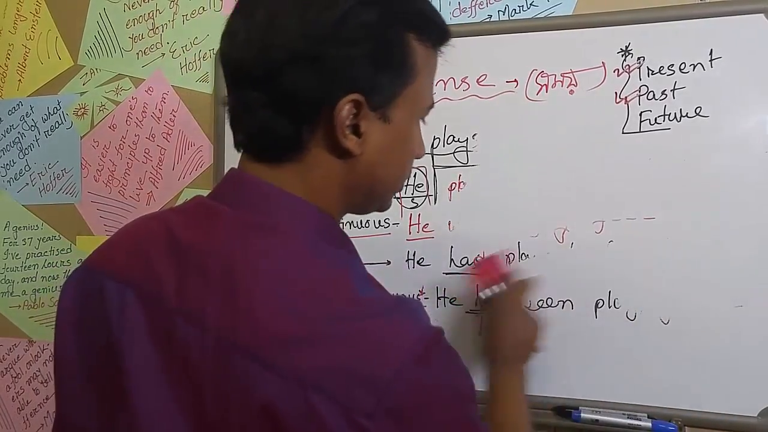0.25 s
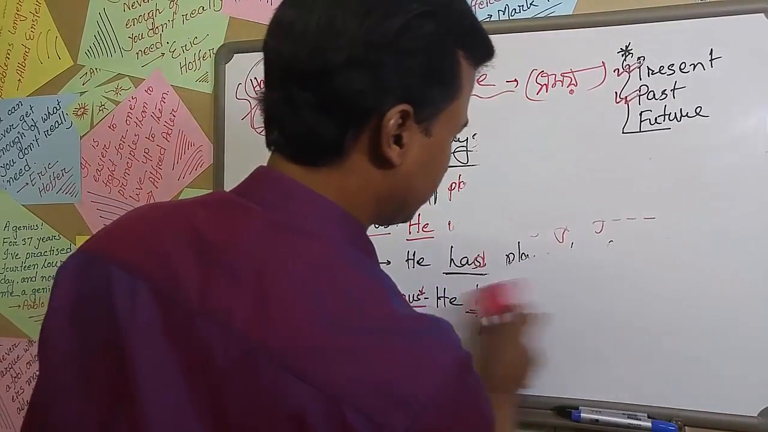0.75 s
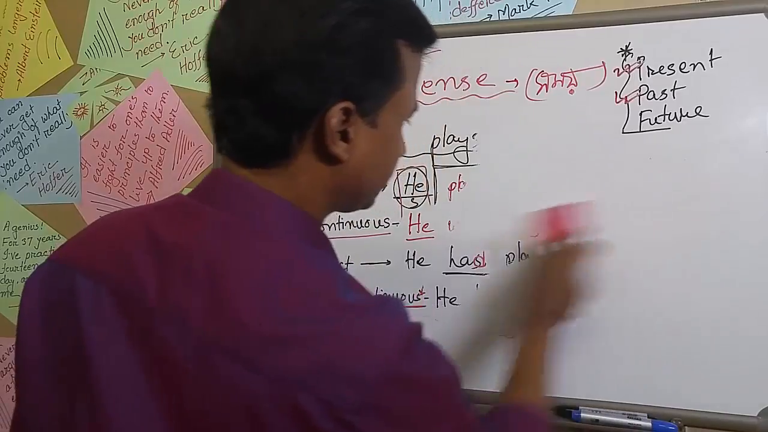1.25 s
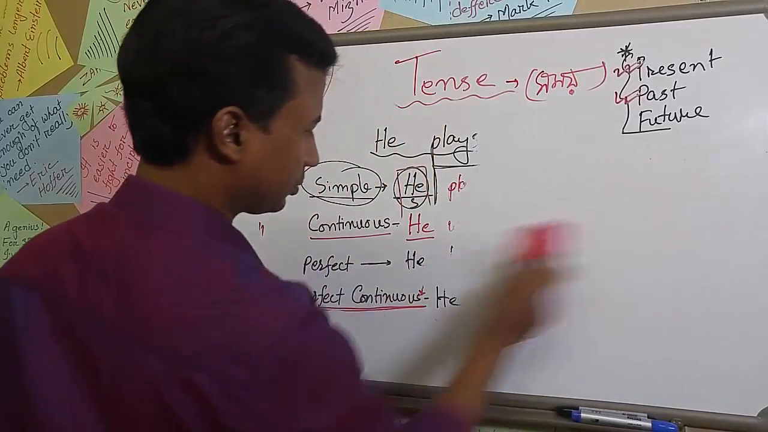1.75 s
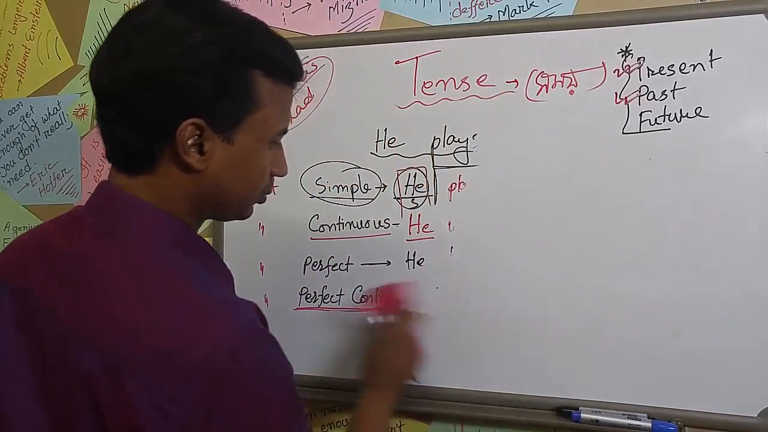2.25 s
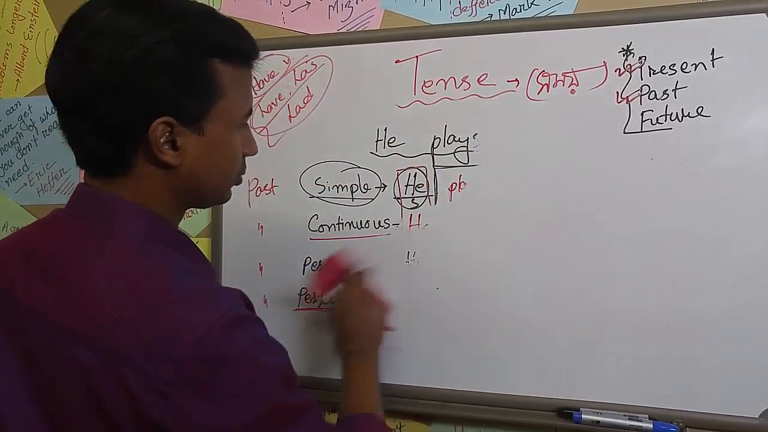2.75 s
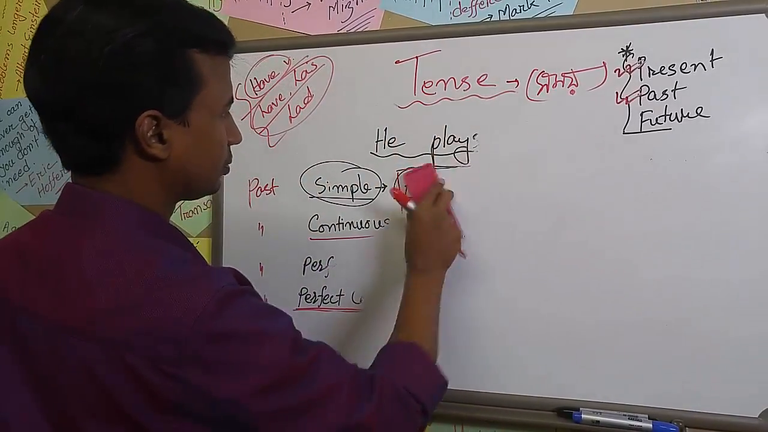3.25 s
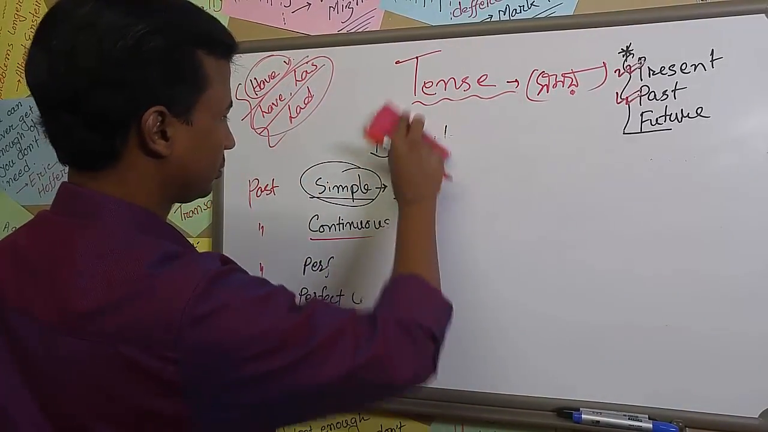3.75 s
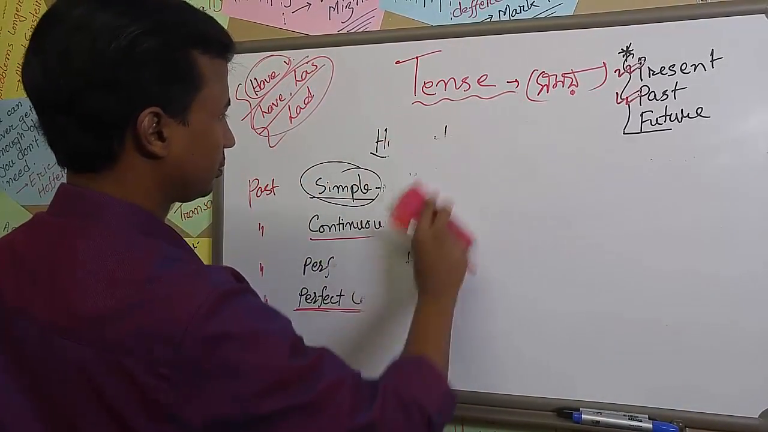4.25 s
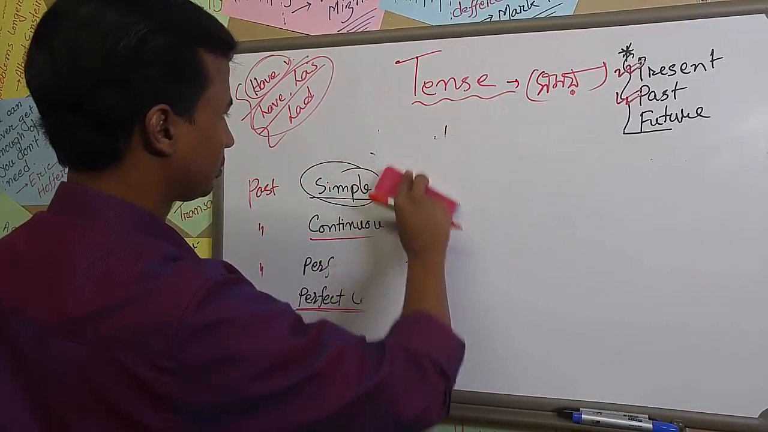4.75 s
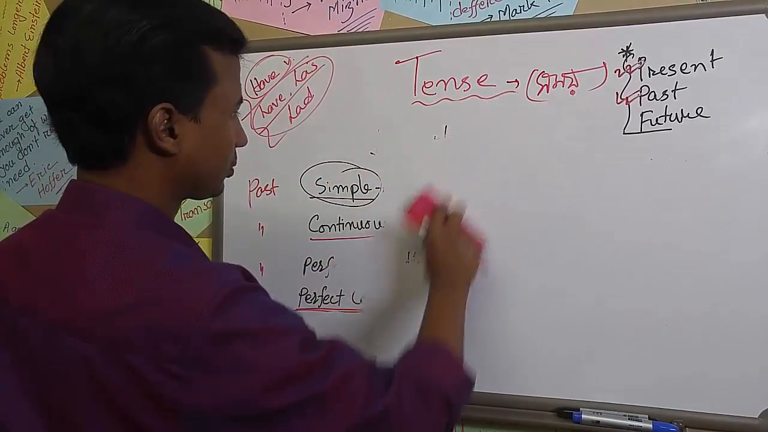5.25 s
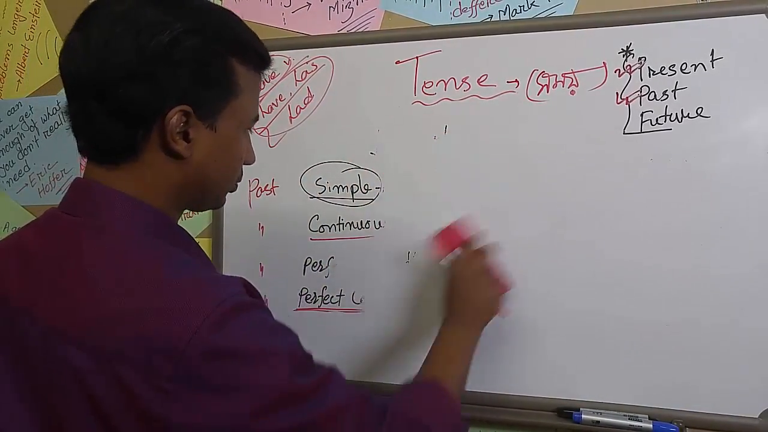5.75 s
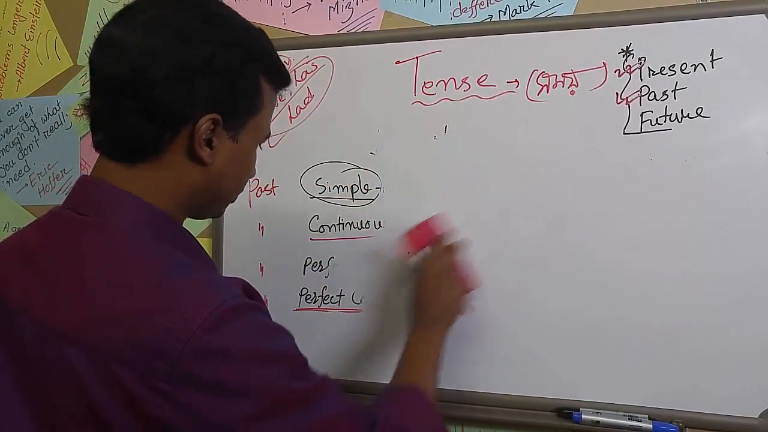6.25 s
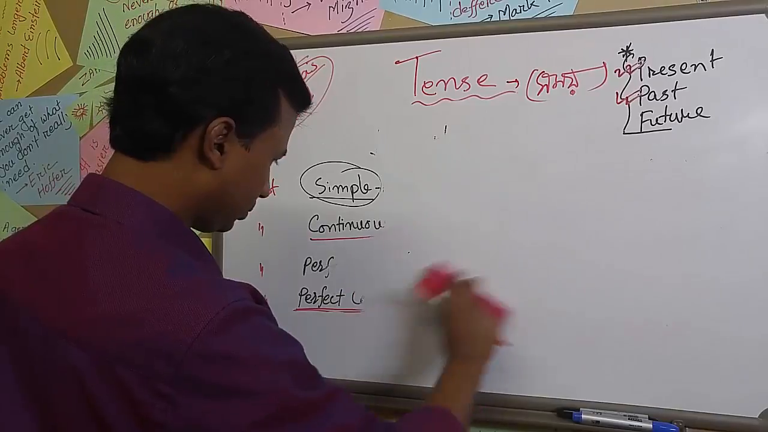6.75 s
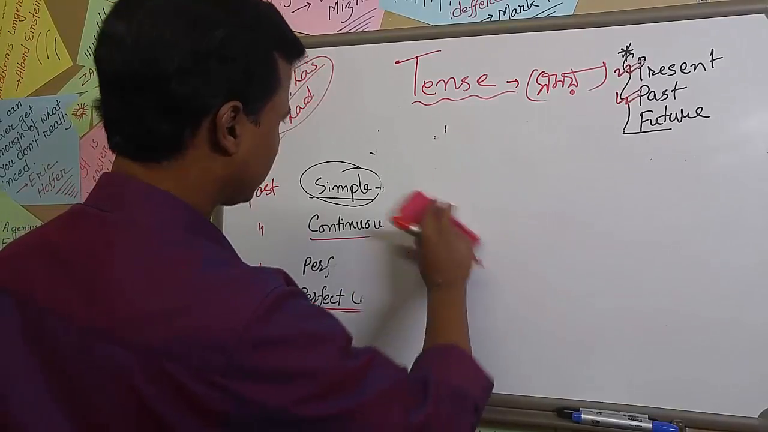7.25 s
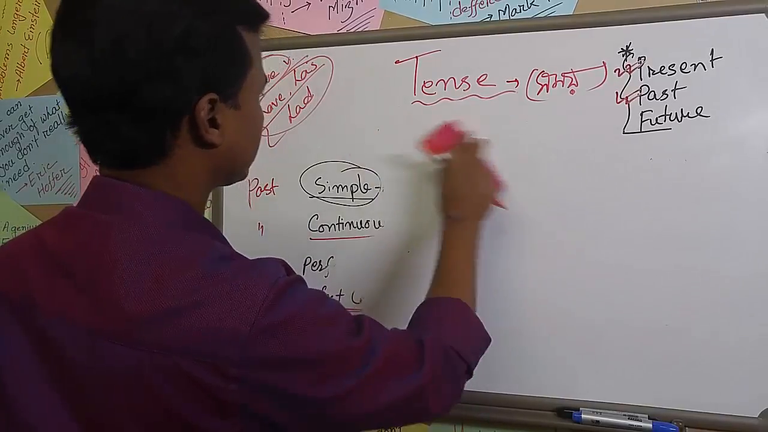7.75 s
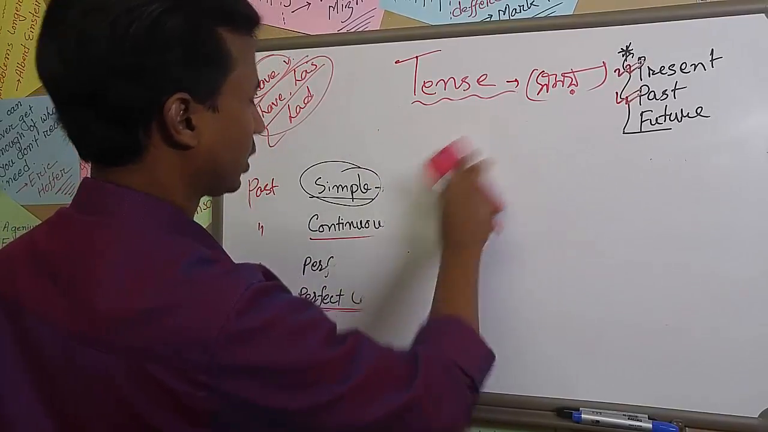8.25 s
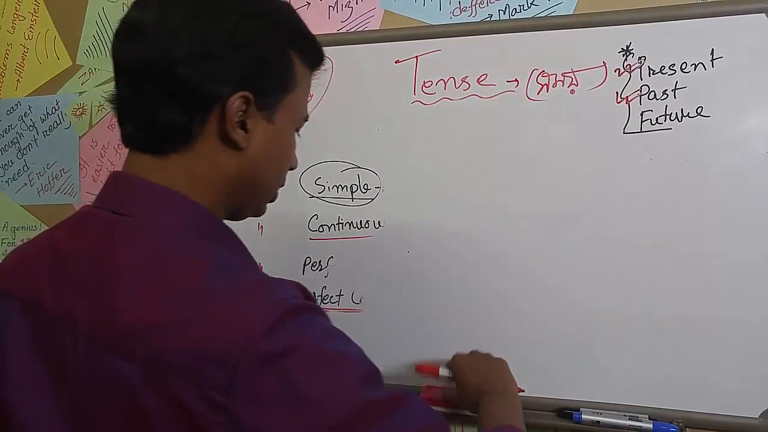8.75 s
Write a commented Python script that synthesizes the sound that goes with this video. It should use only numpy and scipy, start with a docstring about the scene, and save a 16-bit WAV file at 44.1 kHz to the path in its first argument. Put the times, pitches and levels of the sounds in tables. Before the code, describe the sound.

Dry, uneven swishes of an eraser wiping a whiteboard in a quiet small room, a few hollow knocks early, ending with a thump on the ledge.

```python
"""Back-and-forth hisses of a felt eraser on a wall-hung whiteboard, in a small quiet room, with knocks and squeaks.
Random fibre slips, shaped by each sweep of the arm, make the hiss and the panel's low rustle.
Hard landings ring the loose board's modes against the wall; the felt squeaks at unsteady pitches.
At the end the eraser grates along the ledge and drops onto it, ringing the ledge's modes over low thuds.
Rumble and hum lie underneath; the microphone's two ports ring in the treble."""
import sys
import numpy as np
from scipy import signal
from scipy.fft import rfft, irfft, next_fast_len
from scipy.io import wavfile
from scipy.ndimage import uniform_filter1d, map_coordinates

SR = 44100
rng = np.random.default_rng(int(sys.argv[2]) if len(sys.argv) > 2 else 0)


def pcm_store(signal):
    """Save signal as 16-bit PCM."""
    levels = np.round(np.clip(np.atleast_2d(signal), -1, 1) * 32767)
    wavfile.write(sys.argv[1], SR, levels.astype(np.int16).T)


N = 396900  # length in samples

# spectra of light gliding, pressed scraping and the panel's rustle: (freq_hz, relative_level_db)
GLIDE_SPECTRUM = [(600, -20), (1200, -13), (2300, -7), (4000, -5), (7000, -2), (10000, -2.5), (12700, -7.5),
                  (15500, -33)]
SCRAPE_SPECTRUM = [(500, -27), (800, -12), (1750, -14.5), (2400, -9.5), (3400, -1.5), (6000, 0),
                   (8500, 2.5), (11000, -13.5), (12700, -26.5), (14000, -47)]
PANEL_SPECTRUM = [(40, -28), (160, -6.5), (280, -3), (420, -4.5), (510, -7.5), (620, 0), (950, -6),
                  (1400, -11.5), (2200, -14), (5000, -27)]
# the panel's low rustle by where the hand works, before the offsets below: (time_s, level_db)
RUSTLE_LEVEL = [(0, -84), (.3, -74.5), (2.1, -75.5), (3.2, -78.5), (4.3, -75), (5.1, -78), (5.6, -78.5),
                (7.05, -78), (7.45, -72), (7.9, -78.5)]


def eraser(firm_db=-58, scrape_slope=0.67, panel_slope=0.45, panel_db=6.0):
    """Fibres slip on the board: a thin hiss when gliding, a fuller scrape when pressed."""
    rub_db = rubbing()
    force_db = rub_db - firm_db
    pressed = 1 / (1 + amp(-2 * scrape_slope * force_db))  # share of the power that is scrape

    glide_slips = patchy(slips(rate=22000), depth_db=2.5, size=(3, 16))
    scrape_slips = patchy(slips(rate=11000), depth_db=5.5, size=(3, 14))
    glide = amp(-3.0) * np.sqrt(1 - pressed) * coloured(glide_slips, GLIDE_SPECTRUM)
    scrape = np.sqrt(pressed) * coloured(scrape_slips, SCRAPE_SPECTRUM)
    grip = amp(0.5 * wobble(45) + 0.55 * wobble(350))  # the felt grips unevenly
    hiss = amp(rub_db) * grip * (glide + scrape)

    # the heavy panel answers with a low rustle that grows more slowly than the hiss
    panel_slips = patchy(slips(rate=2500), depth_db=3.5, size=(2, 14))
    rustle_db = curve(RUSTLE_LEVEL) + panel_db + panel_slope * force_db + 1.6 * wobble(17)
    panel = amp(rustle_db) * coloured(panel_slips, PANEL_SPECTRUM)
    return walls(hiss + panel, t60=0.1, wet_db=-3.0)


# sweeps of the arm, each lasting until the next begins: (start_s, glide_level_db, share_spent_speeding_up)
ARM_SWEEPS = [(0, -68, 0.56), (0.23, -57, 0.82), (0.503, -63.5, 0.5), (0.789, -66.5, 0.54),
              (1.012, -54, 0.42), (1.298, -70, 0.97), (1.562, -64.5, 0.22), (1.863, -58.5, 1),
              (2.063, -56, 0.21), (2.28, -61.5, 1), (2.52, -59, 0.46), (2.766, -60, 0.43),
              (3.049, -62, 0.15), (3.282, -64, 0.89), (3.455, -63.5, 0.54), (3.607, -61, 0.47),
              (3.773, -68.5, 0.47), (3.894, -63.5, 0.59), (4.137, -63.5, 0.49), (4.32, -63.5, 0.7),
              (4.499, -67, 0.71), (4.738, -64, 0.62), (4.93, -71, 0.4), (5.122, -64, 0.76),
              (5.354, -65, 0.49), (5.602, -65.5, 0.29), (5.852, -64.5, 0.45), (6.038, -63.5, 0.51),
              (6.215, -60.5, 0.28), (6.362, -62.5, 1), (6.534, -63.5, 0.44), (6.684, -62.5, 0.24),
              (7.03, -67, 0.68), (7.37, -65.5, 0.49), (7.786, -65.5, 0.42), (8.041, -64, 0.68),
              (8.209, -67, 0.26), (8.356, -67, 0.11), (8.746, -64.5, 0.95)]
# moments when the felt is pressed hard and bites: (peak_s, peak_level_db, rise_s, fall_s)
HARD_PRESSES = [(.3, -46.5, 0.013, 0.03), (0.449, -56, 0.022, 0.036), (0.754, -46.5, 0.014, 0.028),
                (.665, -63, 0.013, 0.013), (.978, -59.5, 0.042, 0.026), (1.074, -42.5, 0.021, 0.022),
                (1.433, -52.5, 0.034, 0.063), (1.5, -48.5, 0.037, 0.047), (2.027, -44.5, 0.03, 0.027),
                (2.16, -60, 0.019, 0.044), (2.909, -44.5, 0.036, 0.043), (3.11, -46.5, 0.02, 0.037),
                (3.143, -47, 0.023, 0.041), (3.692, -54, 0.03, .035), (4.037, -53.5, 0.046, 0.056),
                (4.193, -61.5, 0.0067, 0.022), (5.792, -53.5, 0.034, 0.035), (6.177, -59, 0.033, 0.032),
                (6.269, -62.5, 0.023, 0.04), (6.929, -64.5, 0.035, 0.025), (7.39, -68, 0.049, 0.18),
                (7.677, -60.5, 0.03, 0.015), (8.457, -56, .005, 0.049), (8.933, -50, 0.01, 0.015)]
SPEED_POWER = 1.07  # the hiss grows with speed to this power
TURN_DB = -74.5  # the pad rounds each turn and never quite stops
# the eraser leaves the board on its way to the ledge: middle of the dip, its half length and depth
LIFT_S, LIFT_HALF_S, LIFT_DB = 8.72, 0.1, -6.5


def rubbing():
    """Strength of the rubbing in dB: the arm speeds up and slows down in each sweep, and presses add to it."""
    t = np.arange(N) / SR
    power = np.full(N, amp(TURN_DB) ** 2)
    ends = [row[0] for row in ARM_SWEEPS[1:]] + [N / SR]
    for (start, db, speeding), end in zip(ARM_SWEEPS, ends):
        fastest = start + np.clip(speeding, 0.05, 0.95) * (end - start)
        speed = np.sin(np.pi / 2 * np.interp(t, [start, fastest, end], [0, 1, 0]))
        power += (amp(db) * speed ** SPEED_POWER) ** 2
    for s, db, rise, fall in HARD_PRESSES:
        near = abs(t - s) < 0.25
        power[near] += (amp(db) * bell(t[near] - s, rise, fall)) ** 2
    return 10 * np.log10(power) + LIFT_DB * bell(t - LIFT_S, LIFT_HALF_S, LIFT_HALF_S)


def slips(rate):
    """Tiny snaps of felt fibres, on average rate a second in each channel, of random size."""
    return (rng.random((2, N)) < rate / SR) * rng.standard_normal((2, N))


def patchy(pair, depth_db, size):
    """The colour shifts as the pad moves over the board: random gain patches over frequency and time."""
    cells = signal.stft(pair, nperseg=512)[2]
    # size is the smoothing in cells: (frequency, time)
    field = uniform_filter1d(rng.standard_normal(cells.shape), size[0], 1)
    field = uniform_filter1d(field, size[1], 2)
    return signal.istft(cells * amp(depth_db * unit(field)), nperseg=512)[1][:, :N]


# knocks of the loose board on the wall, levels before a common trim:
# (start_s, level_db, lowest_hz, highest_hz, rattle_s, rise_s)
BOARD_KNOCKS = [(.289, -23.5, 290, 2140, .018, 0.0055), (.305, -23.5, 530, 1500, .008, 0.00055),
                (.75, -42.5, 1110, 7000, 0.029, 0.0046), (.957, -49, 920, 2580, 0.025, 0.02),
                (1.061, -15, 397, 5100, 0.015, 0.0004), (1.073, -13, 516, 1890, 0.014, 0.0011),
                (1.091, -23.5, 600, 6000, .025, 0.0018), (1.396, -39, 214, 1100, 0.054, 0.018),
                (2.005, -38, 670, 2670, 0.055, 0.0027), (2.095, -40.5, 280, 815, 0.023, 0.0039),
                (2.75, -52, 166, 370, 0.048, 0.011), (6.782, -39, 650, 1700, 0.014, 0.00077),
                (7.207, -46, 500, 2200, 0.021, 0.0027)]
# the board's resonances, ringing freely: (freq_hz, relative_level_db, free_t60_s)
BOARD_MODES = [(142.7, -13.5, 0.27), (223, -3.5, 0.11), (281, -2, 0.12), (333, -1.5, 0.061),
               (397.5, -7.5, 0.1), (554, -6, 0.055), (651, -0.5, 0.097), (709, -6.5, 0.11), (757, -7.5, .1),
               (840, -2.5, .1), (932, -6.5, 0.089), (998, -14.5, 0.15), (1166, -11, 0.125),
               (1290, -15.5, 0.11), (1364, -15.5, 0.13), (1459, -10, 0.096), (1523, -17.5, .08),
               (1705, -19, .11), (2434, -15.5, 0.16), (2815, -9, .09), (2884, -7.5, 0.089),
               (3810, -12, 0.093), (3916, -13, 0.12)]


def board_knocks():
    """Hard landings knock the loose board against the wall and ring its modes."""
    return struck(BOARD_KNOCKS, BOARD_MODES, dense_db=4.0, chatter=0.25)


# the eraser meets the ledge and lands, levels before a common trim:
# (start_s, level_db, lowest_hz, highest_hz, rattle_s, rise_s)
LEDGE_LANDINGS = [(8.641, -49, 1130, 1554, .02, 0.00086), (8.794, -41.5, 555, 1100, 0.029, .006),
                  (8.919, -12, 330, 1050, 0.0162, 0.0033), (8.93, -32, 1470, 2380, .012, 0.00099),
                  (8.94, -22.5, 500, 2200, .016, 0.0011), (8.964, -23.5, 200, 900, .02, 0.0018)]
# the ledge's resonances, ringing freely: (freq_hz, relative_level_db, free_t60_s)
LEDGE_MODES = [(175, 4, 0.2), (214, 3, 0.11), (244, 4.5, 0.091), (290, -1, 0.12), (394, -4, 0.12),
               (585, -5, 0.12), (709, -1, 0.13), (756, 1.5, 0.062), (876, -16, 0.092), (1024, -13.5, 0.1),
               (1327, -24, 0.17), (1520, -33, 0.17), (1862, -16.5, 0.064), (1930, -14, 0.07),
               (2170, -14, .08), (2320, -27, 0.12)]


def ledge_landings():
    """The eraser strikes the ledge and rings its modes."""
    return struck(LEDGE_LANDINGS, LEDGE_MODES, dense_db=-7.5, chatter=0.17)


def struck(rows, resonances, dense_db, chatter, count=6):
    """A loose part is struck and chatters; soft blows swell slowly and lack treble, glancing ones lack bass."""
    out, t = np.zeros((2, N)), np.arange(SR // 3) / SR
    for s, db, low_hz, high_hz, rattle, rise in rows:
        ring = ringing(resonances, dense_db)
        blow = ring.copy()
        for late, size in zip(rng.random(count), rng.standard_normal(count)):
            add(blow, late * rattle, chatter * size * (1 - late / 2) * ring)
        top_hz = np.clip(high_hz, low_hz + 50, SR / 3)
        band = signal.butter(2, [low_hz, top_hz], "band", fs=SR, output="sos")
        blow = signal.sosfilt(band, blow * (1 - np.exp(-t / rise)))
        early_level = blow[:, :SR // 50].std()  # the first 20 ms
        add(out, s, amp(db - 16.5) * blow / early_level)
    return out


RING_SHARE = 0.92  # share of the free ring time that the hand leaves


def ringing(resonances, dense_db, dense_t60=0.15, dense_hz=1000, apart_hz=1100, vary_db=2.0, detune=0.0054):
    """One blow's ring at both ports: slightly shifted low modes under a noise of modes too dense to tell apart."""
    t = np.arange(SR // 3) / SR
    hz, db, t60 = np.transpose(resonances)[:, :, None]
    size = amp(db + vary_db * rng.standard_normal(hz.shape))
    hz = hz * (1 + detune * rng.standard_normal(hz.shape))  # the hand shifts each mode a little
    # short waves reach the two ports in different phases, long waves together
    port_phase = hz / apart_hz * rng.standard_normal((2, *hz.shape))
    phase = 2 * np.pi * rng.random(hz.shape) + port_phase
    decay = amp(-60 * t / (t60 * RING_SHARE))
    modes = np.sum(size * decay * np.sin(2 * np.pi * hz * t + phase), axis=1)
    b, a = signal.butter(2, dense_hz, "high", fs=SR)
    dense = signal.lfilter(b, a, rng.standard_normal((2, len(t))))
    return modes + amp(dense_db - 60 * t / (dense_t60 * RING_SHARE)) * dense


# the eraser drags along the ledge: (peak_s, peak_level_db, rise_s, fall_s)
LEDGE_DRAGS = [(8.816, -58.5, 0.025, 0.046), (8.87, -68, 0.07, 0.087), (8.94, -45.5, 0.027, 0.034)]
# colour of the grating: (freq_hz, relative_level_db)
DRAG_SPECTRUM = [(100, -5), (300, -2), (720, 4.5), (1000, -9), (1350, -1), (1650, -16), (1950, -8),
                 (2600, -20), (8000, -31)]


def drag():
    """The hard back of the eraser grates over the ledge in a run of tiny slips."""
    t = np.arange(N) / SR
    power = sum((amp(db) * bell(t - s, rise, fall)) ** 2 for s, db, rise, fall in LEDGE_DRAGS)
    return np.sqrt(power) * coloured(slips(rate=1800), DRAG_SPECTRUM)


# low thuds under the board's knocks and the eraser's landing on the ledge, before the walls:
# (start_s, peak_level_db, pitch_hz, rise_s)
LOW_THUDS = [(1.06, -34, 142, 0.0098), (1.06, -24.5, 315, 0.0052), (1.405, -49, 73, 0.0069),
             (1.4, -45.5, 281, .011), (1.449, -56.5, 289, 0.008), (1.82, -61, 85, .01),
             (2.091, -33, 271.3, 0.0061), (2.108, -38, 282, 0.0039), (2.36, -68, 120, 0.017),
             (2.75, -54, 254, 0.0068), (3.011, -66, 149, 0.0073), (7.206, -56.5, 140, 0.0089),
             (7.21, -47.5, 284, 0.0096), (8.915, -22.5, 236.4, 0.0076), (8.922, -26, 178.4, 0.014),
             (8.924, -40.5, 111, 0.021), (8.962, -31.5, 196, 0.0104)]


def thuds():
    """Each thud is a low sine in a brief swell that soon dies."""
    out, t = np.zeros(N), np.arange(SR // 4) / SR
    for s, db, hz, rise in LOW_THUDS:
        swell = (t / rise * np.exp(1 - t / rise)) ** 2
        add(out, s, amp(db) * swell * np.sin(2 * np.pi * hz * t))
    return walls(np.tile(out, (2, 1)), t60=0.18, wet_db=-13.0)


# squeaks and groans of the felt catching, before the walls: (middle_s, level_db, pitch_hz, half_length_s)
FELT_SQUEAKS = [(1.402, -46, 787, 0.0074), (1.427, -50, 623, 0.01), (1.423, -59.5, 1380, 0.02),
                (5.805, -68, 3550, .02), (6.177, -63, 5230, .016), (6.179, -60.5, 9050, 0.021),
                (6.775, -52.5, 1120, 0.0083), (6.786, -45.5, 1060, 0.0038), (6.787, -60.5, 1545, 0.013),
                (6.801, -51, 1050, 0.0037), (6.932, -66.5, 8030, .025), (7.214, -51.5, 2170, 0.0068),
                (7.225, -58, 1920, 0.0087), (7.237, -64, 2290, 0.018), (8.464, -55, 7870, 0.011)]


def squeaks(waver=0.045, flutter_db=3.5):
    """Felt sticks and slips for an instant at an unsteady pitch."""
    out, t = np.zeros(N), np.arange(N) / SR
    drifting_s = np.cumsum(1 + waver * wobble(700)) / SR  # a clock that runs unevenly bends the pitch
    flutter = amp(flutter_db * wobble(400))
    for s, db, hz, half in FELT_SQUEAKS:
        near = abs(t - s) < 0.15
        phase = 2 * np.pi * hz * (drifting_s[near] - drifting_s[round(s * SR)])
        swell = bell(t[near] - s, half, half)
        tone = unit(swell * flutter[near] * np.sin(phase))
        out[near] += amp(db) * np.sqrt(np.mean(swell ** 2)) * tone
    return walls(np.tile(out, (2, 1)), t60=0.061, wet_db=-2)


# spectra of the still room and of a distant, uneven rumble: (freq_hz, relative_level_db)
QUIET_SPECTRUM = [(20, -12.5), (45, -9.5), (62, 1.5), (130, -15.5), (350, -13.5), (500, -14), (700, -13.5),
                  (2000, -28.5), (9000, -30), (13000, -35.5), (15500, -49)]
RUMBLE_SPECTRUM = [(25, -11.5), (60, 1), (130, -3.5), (300, -26.5), (1000, -89)]


def still_room():
    """Steady soft noise of the room, with a distant rumble whose level wanders."""
    quiet = amp(-76.0) * coloured(rng.standard_normal((2, N)), QUIET_SPECTRUM)
    rumble = coloured(rng.standard_normal((2, N)), RUMBLE_SPECTRUM)
    return quiet + amp(-82.5 + 1.3 * wobble(6.3)) * rumble


# a faint electric hum in the room: (pitch_hz, rms_level_db)
HUM_TONES = [(59.2, -89), (119.5, -90)]


def hum():
    """Steady low tones, the same at both ports."""
    t = np.arange(N) / SR
    tones = sum(amp(db) * np.sin(2 * np.pi * (hz * t + rng.random())) for hz, db in HUM_TONES)
    return np.sqrt(2) * tones  # from rms to peak


def walls(x, t60, wet_db):
    """Near walls return a short diffuse tail, different at each port, that changes as the hand moves."""
    t = np.arange(SR // 3) / SR
    tails = rng.standard_normal((2, 2, len(t))) * amp(-60 * t / t60)
    tails = tails / np.linalg.norm(tails[0, 0])
    one, other = signal.fftconvolve(x[None], tails, axes=2)[..., :N]
    place = np.pi / 2 * wobble(2)  # a random drift between the two tails
    return x + amp(wet_db) * (np.cos(place) * one + np.sin(place) * other)


# how alike the left and right ports hear a sound: (freq_hz, likeness_0_to_1)
PORT_LIKENESS = [(50, 0.082), (150, 0.51), (380, 0.38), (650, 0.18), (1200, 0.075), (3000, 0.088),
                 (15000, 0.077)]


def spread(pair):
    """Two unrelated signals become left and right: most alike in the upper bass, nearly unrelated in the treble."""
    turn = lambda hz: np.arccos(np.clip(along(PORT_LIKENESS, hz), -1, 1)) / 2
    mid, side = filtered(pair, lambda hz: np.array([np.cos(turn(hz)), np.sin(turn(hz))]))
    return np.array([mid + side, mid - side])


def coloured(pair, spectrum):
    """A stereo signal of rms 1 with the given spectrum."""
    return unit(spread(filtered(pair, lambda hz: amp(along(spectrum, hz)))))


def filtered(x, response):
    """x times a response of frequency."""
    n = x.shape[-1]
    m = next_fast_len(n + 8192)  # padded against wrap-around
    return irfft(rfft(x, m) * response(np.fft.rfftfreq(m, 1 / SR)), m)[..., :n]


def amp(db):
    """Decibels to gain."""
    return 10 ** (np.asarray(db) / 20)


def unit(x):
    """Scale to rms 1."""
    return x / np.sqrt(np.mean(x ** 2) + 1e-20)


def along(points, hz):
    """Read (freq_hz, value) points on a log frequency axis."""
    f, v = np.transpose(points)
    return np.interp(np.log(hz + 1), np.log(f), v)


def curve(rows):
    """One value per sample from (time_s, value) rows."""
    return np.interp(np.arange(N) / SR, *np.transpose(rows))


def wobble(rate):
    """A smooth random curve with rate knots a second."""
    knots = rng.standard_normal(int(N * rate / SR) + 4)
    return map_coordinates(knots, [np.arange(N) * rate / SR])


def bell(t, rise, fall):
    """A smooth swell that peaks at t = 0."""
    return np.exp(-(t / np.where(t < 0, rise, fall)) ** 2)


def add(track, s, sound):
    """Mix a sound into the track at time s."""
    part = track[..., max(round(s * SR), 0):][..., :sound.shape[-1]]
    part += sound[..., :part.shape[-1]]


def scene():
    """Strokes, knocks, thuds and squeaks over the faint rumble and hum of the room."""
    board = eraser() + board_knocks() + squeaks()
    ledge = ledge_landings() + drag()
    return board + ledge + thuds() + still_room() + hum()


# left and right microphone port resonances: (centre_hz, width_hz, boost_db)
PORT_RINGS = [(8440, 350, 10.5), (9073, 374, 12)]
HOLLOW_HZ, HOLLOW_WIDTH_HZ, HOLLOW_DEPTH = 511, 115, 0.65  # a narrow dip; the depth is a share of the amplitude
TOP_HZ = 15400  # band limit


def record(dry):
    """The low mids are slightly hollow; each port rings at its own pitch; nothing is kept above the band limit."""
    centre, width, db = np.transpose(PORT_RINGS)[:, :, None]
    peak = lambda hz, at, wide: 1j * hz * wide / (at ** 2 - hz ** 2 + 1j * hz * wide)
    ports = lambda hz: 1 + (amp(db) - 1) * peak(hz, centre, width)
    hollow = lambda hz: 1 - HOLLOW_DEPTH * peak(hz, HOLLOW_HZ, HOLLOW_WIDTH_HZ)
    return filtered(dry, lambda hz: ports(hz) * hollow(hz) * (hz < TOP_HZ))


dry = scene()
out = record(dry)
pcm_store(out)
```